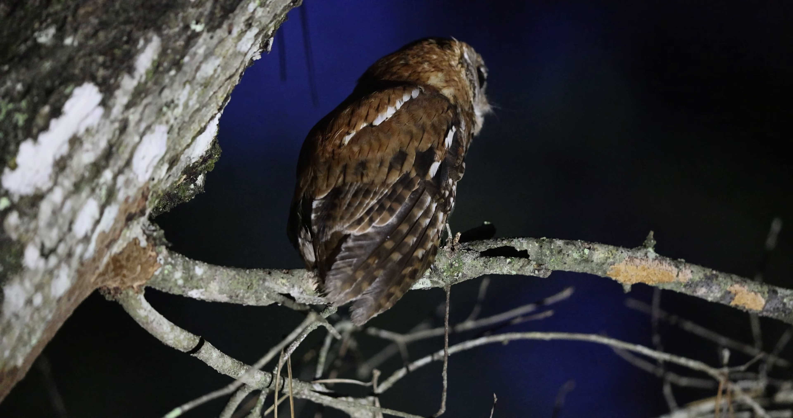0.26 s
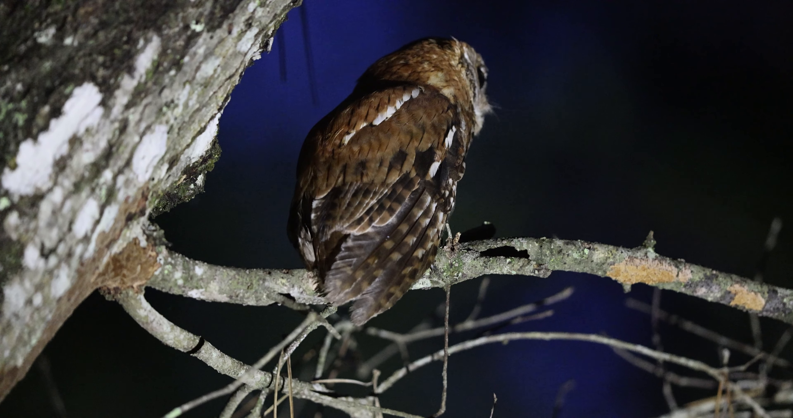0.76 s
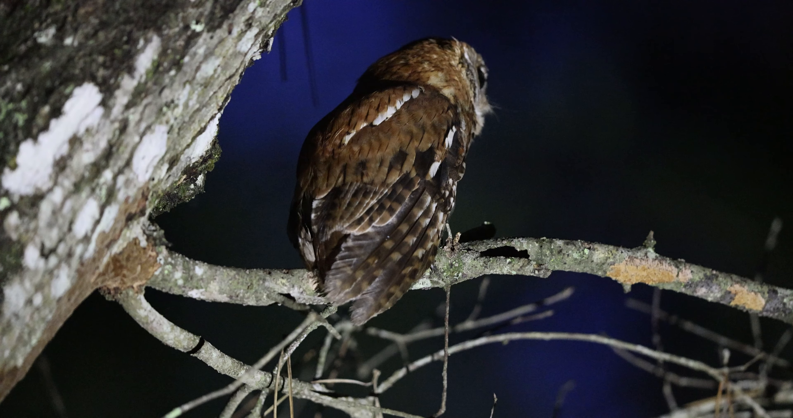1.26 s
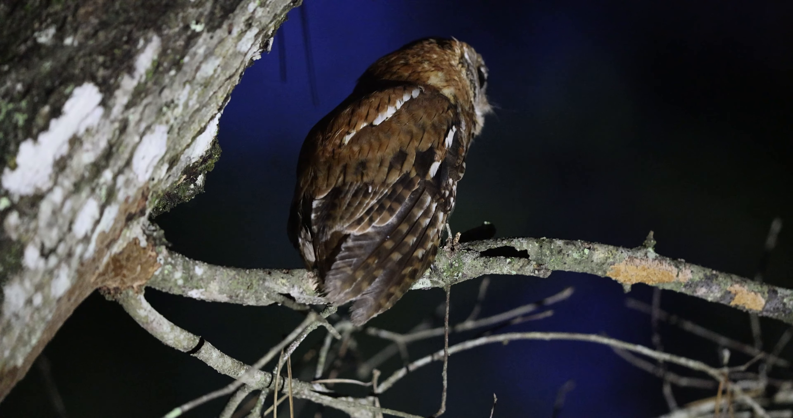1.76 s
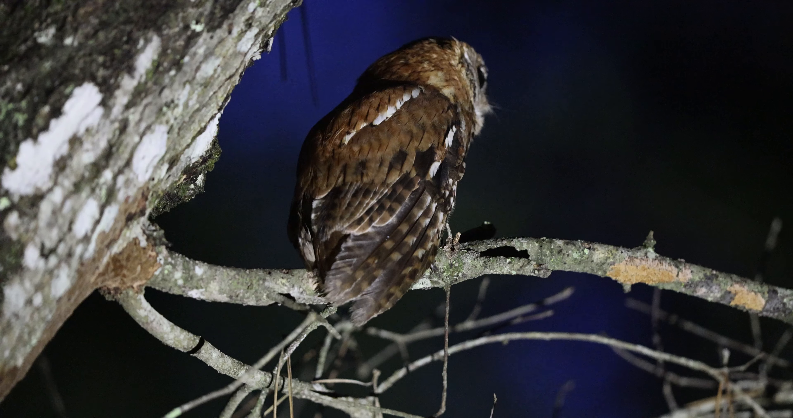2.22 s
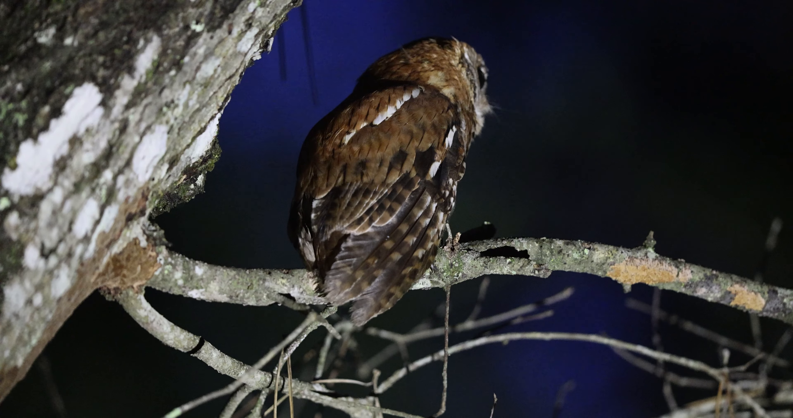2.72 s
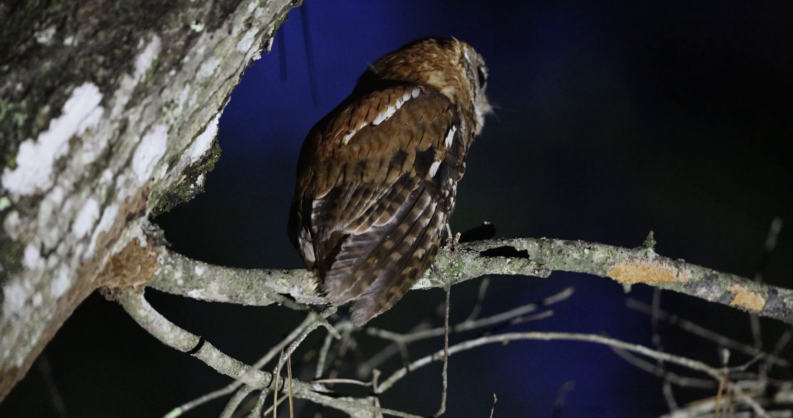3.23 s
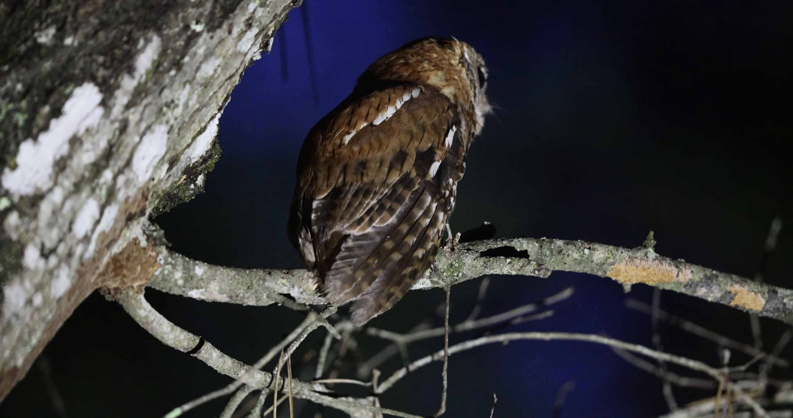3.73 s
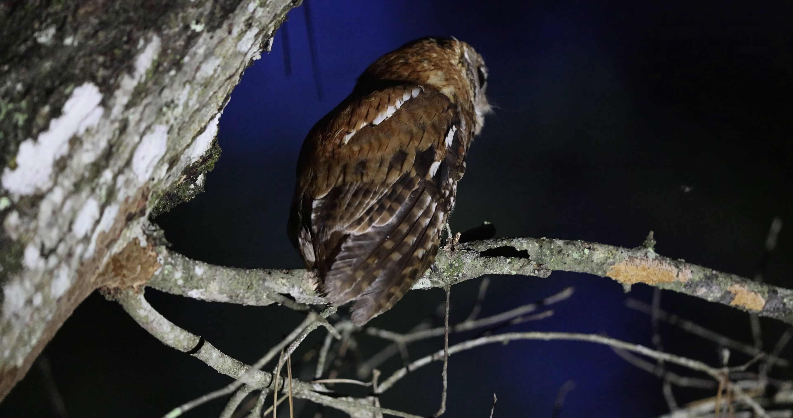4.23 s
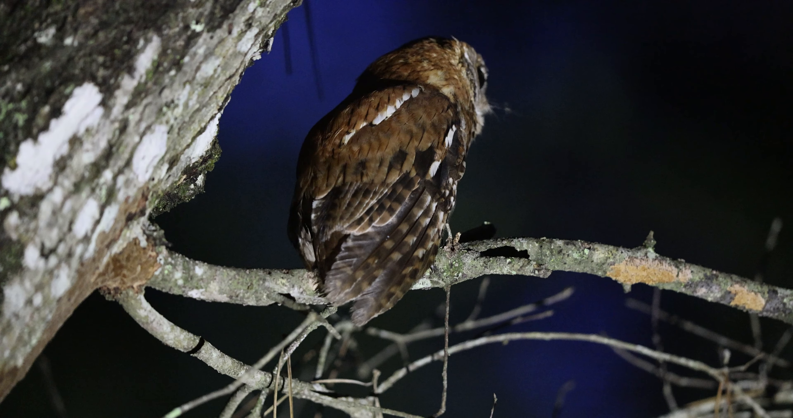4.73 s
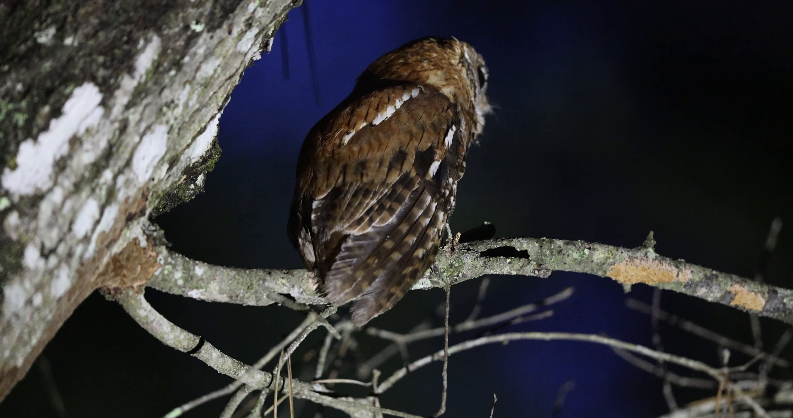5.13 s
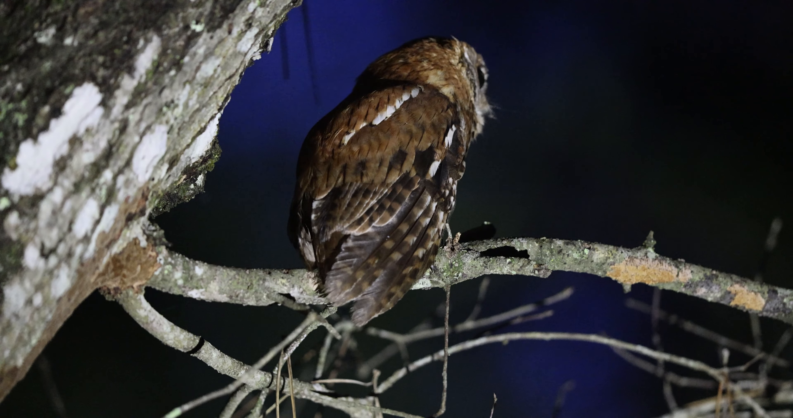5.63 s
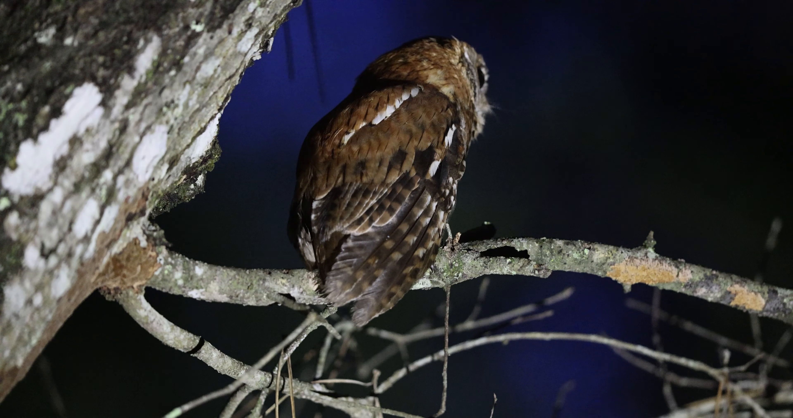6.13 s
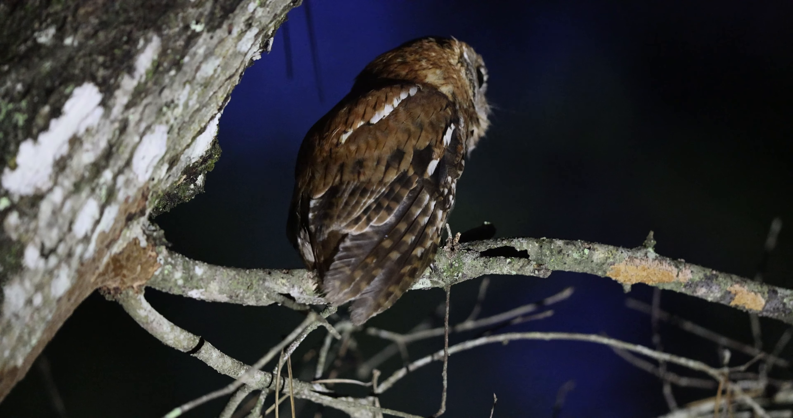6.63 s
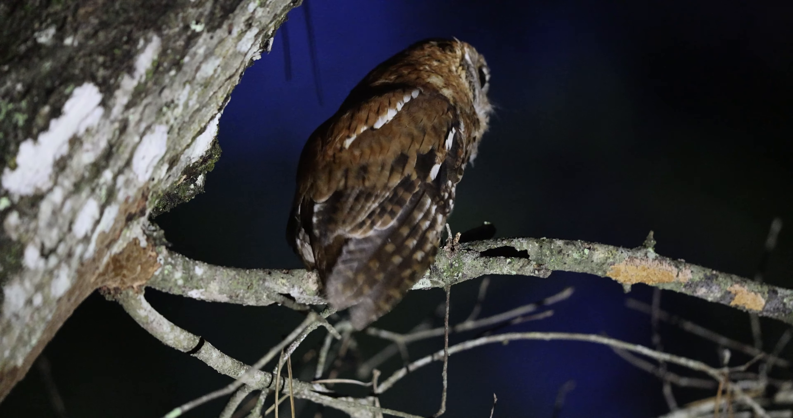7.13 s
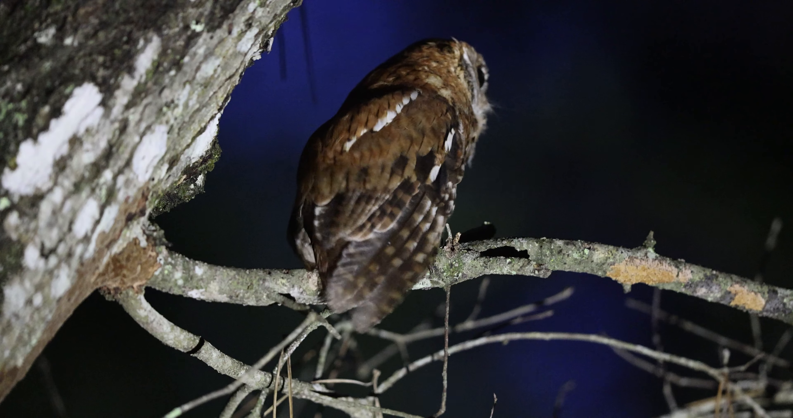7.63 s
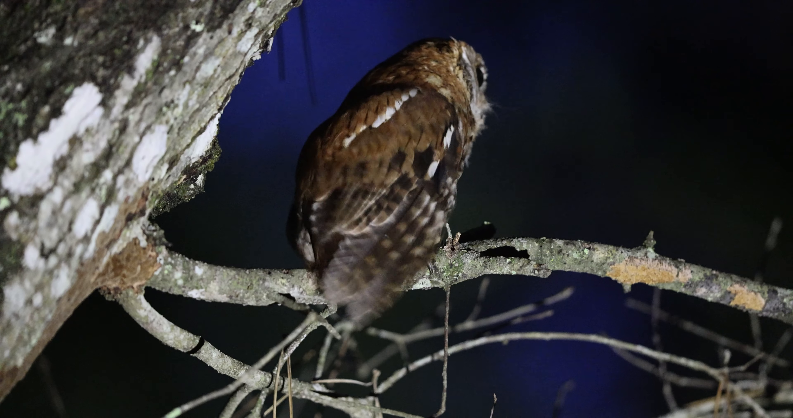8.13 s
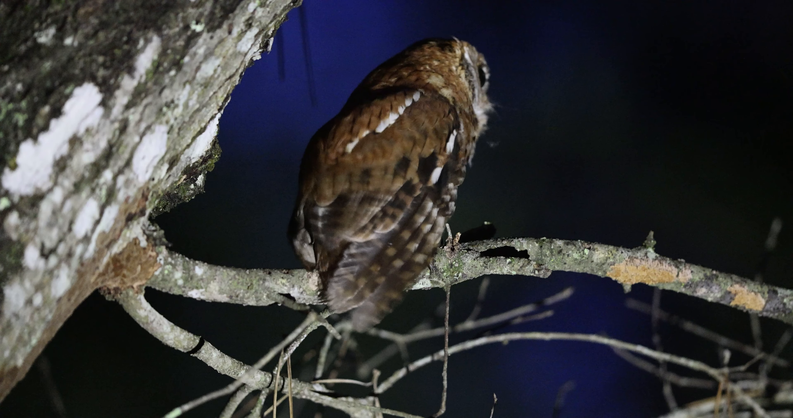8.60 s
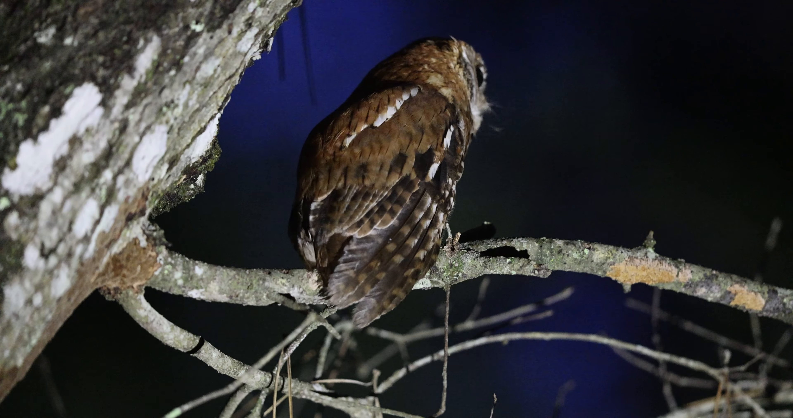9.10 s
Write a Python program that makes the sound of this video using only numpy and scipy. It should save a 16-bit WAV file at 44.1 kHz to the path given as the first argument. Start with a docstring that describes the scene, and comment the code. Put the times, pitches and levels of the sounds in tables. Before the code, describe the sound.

A high, throbbing cricket chorus and a buzzing katydid fill the woods at night. Lower insect trills and dry rasps come and go. Far off, a night bird repeats a short whistled song, and thin high chirps echo through the first half. Twigs tick faintly over a low wash of air, with one dull knock. Near the end, an owl close to the microphone gives one soft trill lasting about two seconds.

```python
"""A throbbing cricket chorus and a buzzing katydid fill the woods at night; lower trills and dry rasps
come and go. These insects stridulate: each wing stroke gives a brief tone or a run of tooth clicks.
Far off a nightjar repeats its whistled song and something chirps high up, both echoing among the trees.
Twigs tick over a low wash of air, and there is one dull knock and one faint moan. Late on, a screech owl
close by gives one soft trill of nearly pure notes, each arching in pitch with the pressure of its puff."""
import sys
import numpy as np
from scipy import signal
from scipy.fft import rfft, irfft
from scipy.io import wavfile
from scipy.ndimage import uniform_filter1d

SR = 44100
rng = np.random.default_rng(int(sys.argv[2]) if len(sys.argv) > 2 else 0)


def transcribe(u):
    """Save the signal u as a 16-bit wav file named by the first command-line argument.

    u: samples, shape (n,) or (channels, n), limited to [-1, 1]; the rate is SR.
    q: integer samples, one column per channel.
    """
    v = np.clip(np.atleast_2d(u).T, -1, 1)
    q = np.round(v * 32767).astype(np.int16)
    wavfile.write(sys.argv[1], SR, q)


N = 412776
TIME = np.arange(N) / SR

# Near crickets of the chorus. Each row: pitch in Hz, pulses per second, relative level in dB.
CHORUS_VOICES = [(6370, 47, -18.5), (6556, 57, -4), (6680, 67, 1), (6874, 75, -2.5), (6820, 56.7, 3),
                 (6800, 50, -4), (7150, 43, -25), (7030, 71, -5)]
# Spectrum of the far crickets. Each row: frequency in Hz, relative level in dB.
FAR_CRICKET_SPECTRUM = [(5700, -30), (6100, -25), (6400, -8.5), (6650, 0), (6820, -0.5), (7100, -12),
                        (7350, -34), (7600, -34)]
# Throbbing of the chorus. Each row: throbs per second, time of one crest in seconds, depth in dB.
CHORUS_THROBS = [(3.553, .151, 1.3), (3.389, .287, .75), (3.212, .027, .6)]
# Loudness of the near katydid. Each row: time in seconds, level in dB before the trim.
KATYDID_LEVELS = [(0.0, -55), (3.8, -56), (4.8, -54.5), (8.26, -58), (9.36, -56)]
# Tooth strikes in one wing stroke. Each row: position as a share of the stroke, relative level in dB.
TOOTH_STRIKES = [(.08, 0), (.19, -1), (.28, 0), (.36, 0), (.43, -3), (.55, -5)]
# Spectrum of the near katydid's buzz as picked up; the microphone or audio coder adds the narrow
# notch at 13.9 kHz. Each row: frequency in Hz, relative level in dB.
PICKED_UP_BUZZ_SPECTRUM = [(6500, -30), (7700, -3), (9500, 3), (10800, -1), (12300, -1), (12700, -6),
                           (13500, -4), (13900, -10), (14250, -2), (14700, 1), (15200, -6), (15700, -7)]
# Spectrum of the far katydids. Each row: frequency in Hz, relative level in dB.
FAR_KATYDID_SPECTRUM = [(6800, -35), (7350, 1.5), (7500, -1), (8700, 1.5), (9800, 0.5), (11000, -9.5),
                        (12300, -18), (12800, -39), (15700, -35)]
# Pulsed trills, likely tree crickets. Each row: start, end and swell time in seconds, pitch in Hz,
# pulses per second, share of each stroke that sounds, level in dB before the trim.
TRILL_BOUTS = [(-.2, .92, .1, 3060, 66.5, .8, -55), (.94, 1.618, .2, 3150, 66.2, .68, -41),
               (1.5, 4.7, .1, 3020, 66, .9, -64.5), (1.8, 3.3, .2, 3055, 66, .8, -55.7),
               (1.88, 2.47, .3, 3025, 68, .85, -52.7), (3.22, 4.03, .26, 2985, 68, 1, -50.5),
               (5.08, 6.96, .15, 3060, 66.7, .8, -55), (6.08, 6.72, .15, 3020, 68.5, .68, -53.5),
               (6.94, 9.5, .12, 3140, 66.5, .66, -53.5), (7.38, 8.42, .25, 2985, 68, 1, -50.3)]
# Distant insect rasping. Each row: start and end in seconds, full level in dB before the trim.
RASP_BOUTS = [(-.8, .22, -63), (.2, .93, -63), (1.4, 2.65, -62), (3.5, 4.5, -63), (5.55, 6.38, -61),
              (7.0, 8.48, -63)]
# Spectra of the rasp and of the night air. Each row: frequency in Hz, relative level in dB.
RASP_SPECTRUM = [(3200, -33), (3550, 5), (4000, 2), (4400, 1), (4650, -9.5)]
AIR_SPECTRUM = [(15, -67), (25, -29), (48, -17), (64, -14.5), (85, -6), (152, -5.5), (216, -5), (295, -5.5),
                (331, -2), (470, -3), (560, 1), (842, -7.5), (1480, -3), (1910, -6), (2600, -9.5),
                (3380, -11), (5720, -120)]
# A far low drone, perhaps traffic. Each row: time in seconds, pitch in Hz, level in dB.
DRONE_CONTOUR = [(0, 125, -81), (2.3, 120, -88), (2.8, 108, -73.5), (3.5, 104, -75), (4.0, 88, -74.5),
                 (5.0, 84, -81), (6.2, 120, -92)]
# Songs of the nightjar. Each row: time in seconds, level in dB before the trim.
NIGHTJAR_SONGS = [(.365, -45), (2.621, -43.5), (5.105, -44.5), (7.119, -44), (9.232, -43)]
# One contour per syllable: a faint cluck, then two whistles.
# Each row: offset from the song's time in seconds, pitch in Hz, relative level in dB.
NIGHTJAR_SYLLABLES = [
    [(-.32, 2400, -26), (-.305, 2050, -10), (-.29, 1700, -11), (-.275, 1400, -30)],
    [(-.03, 1250, -17), (-.002, 1650, -5), (.011, 2100, -7), (.022, 2480, -9), (.037, 1900, -9),
     (.057, 1350, -11), (.072, 1650, -7), (.092, 1940, -3), (.118, 1700, 1), (.148, 1630, 0),
     (.172, 1480, -16)],
    [(.358, 1400, -16), (.376, 1620, 2), (.39, 1720, 0), (.4, 2150, -6), (.411, 2540, -7), (.424, 2000, -7),
     (.445, 1650, -6), (.465, 2100, -8), (.51, 1400, -9), (.55, 1200, -18)],
]
# Clear snaps in the foliage. Each row: time in seconds, level in dB before the trim.
CLEAR_TICKS = [(0.189, -46), (1.028, -42), (2.165, -46), (2.514, -49), (4.47, -50), (4.9986, -54),
               (6.621, -45), (8.7894, -47), (8.8478, -51)]
# Spectrum of a snap. Each row: frequency in Hz, relative level in dB.
TICK_SPECTRUM = [(400, -8), (900, -0.5), (1400, 4), (2400, 0), (4000, -7), (7000, -32)]
# High falling chirps. Each entry: time in seconds.
CHIRP_TIMES = [.27, .685, 1.04, 1.468, 1.91, 2.278, 2.615, 2.985, 3.42, 3.825, 4.228, 4.688]
# One chirp. Each row: offset from its time in seconds, pitch as a ratio, relative level in dB.
CHIRP_CONTOUR = [(-.025, .955, -16), (-.008, .995, -3), (.005, 1.012, 0), (.03, .985, 0), (.06, .952, -2),
                 (.1, .91, -13)]
# Spectra of the knock and of the moan. Each row: frequency in Hz, relative level in dB.
KNOCK_SPECTRUM = [(500, -4), (800, -2), (1150, 1), (1600, -7), (2500, -20)]
MOAN_SPECTRUM = [(280, -18), (335, -2), (385, -4), (450, -14)]
# The owl quickens, eases off, then hurries to the end. Each row: time in seconds, notes per second.
OWL_NOTE_RATES = [(6.78, 13.61), (6.835, 12.45), (7.713, 15.15), (8.046, 11.22), (8.357, 12.5),
                  (8.636, 17.06), (8.94, 16.31)]
# How hard the owl sings. Each row: time in seconds, peak level of the fundamental in dB.
OWL_LEVELS = [(6.78, -48.5), (6.85, -41.5), (6.96, -38), (7.25, -36.5), (7.6, -38), (8.03, -37),
              (8.63, -38), (8.77, -40), (8.94, -41.5), (9.0, -47.5)]


def from_db(db):
    """Amplitude grows tenfold for every 20 dB."""
    return 10 ** (np.asarray(db) / 20)


def unit_power(x):
    """Dividing a signal by its RMS value gives it unit power."""
    return x / np.sqrt(np.mean(x ** 2) + 1e-20)


def along(rows, at=TIME):
    """Linear interpolation reads each later column of a table against the first."""
    first, *columns = np.transpose(rows)
    return [np.interp(at, first, column) for column in columns]


def drift(cutoff_hz):
    """Low-pass filtering turns white noise into a smooth fluctuation of unit power."""
    hz = np.fft.rfftfreq(N, 1 / SR)
    return unit_power(irfft(rfft(rng.standard_normal(N)) / (1 + (hz / cutoff_hz) ** 4), N))


def coloured(x, spectrum):
    """A filter imposes a spectrum that falls 40 dB per octave beyond its ends; output has unit power."""
    hz = np.maximum(np.fft.rfftfreq(N, 1 / SR), 1)
    points_hz, db = np.transpose(spectrum)
    octaves_outside = np.abs(np.log2(hz / np.clip(hz, points_hz[0], points_hz[-1])))
    gain = from_db(np.interp(np.log(hz), np.log(points_hz), db) - 40 * octaves_outside)
    return unit_power(irfft(rfft(x) * gain, N))


def hiss(spectrum):
    """Filtered white noise takes on the spectrum of the filter."""
    return coloured(rng.standard_normal(N), spectrum)


def phase_of(hz):
    """Phase is the time integral of frequency."""
    return 2 * np.pi * np.cumsum(hz) / SR


def woods(x, wet_db, t60):
    """Scattering from trunks and leaves adds to the direct sound a tail that falls 60 dB in t60 seconds."""
    t = TIME[:SR]
    build_up = np.clip((t - .004) / .015, 0, 1)
    scatter = rng.standard_normal(SR) * from_db(-60 * t / t60) * build_up
    return x + from_db(wet_db) * signal.fftconvolve(x, scatter / np.linalg.norm(scatter))[:N]


def stridulation(per_s, hz, duty, sag, jitter, slip_rad):
    """Each wing stroke excites a short, sagging tone; timing, pitch, strength and phase vary by chance."""
    strokes = np.cumsum(per_s * (1 + jitter * drift(30))) / SR
    position, index = strokes % 1, strokes.astype(int)
    detune, strength, start_phase = rng.standard_normal((3, index[-1] + 1))[:, index]
    pulse = np.sin(np.pi * np.minimum(position / duty, 1)) * from_db(.5 * strength)
    pitch = hz * (1 + .1 * jitter * detune - sag * (position - duty / 2))
    return unit_power(pulse * np.sin(phase_of(pitch) + slip_rad * start_phase))


def cricket_chorus(level_db=-45, waver_db=.78):
    """Near and far crickets superpose and throb together at three close rates, which beat."""
    near = sum(from_db(db) * stridulation(per_s, hz, duty=.85, sag=.012, jitter=.04, slip_rad=.82)
               for hz, per_s, db in CHORUS_VOICES)
    voices = unit_power(woods(near, wet_db=-6, t60=.18)) + from_db(-1) * hiss(FAR_CRICKET_SPECTRUM)
    throb_db = sum(depth * np.cos(2 * np.pi * per_s * (TIME - crest))
                   for per_s, crest, depth in CHORUS_THROBS)
    return unit_power(voices) * from_db(level_db + throb_db + waver_db * drift(9))


def close_echoes(x, decay_s, ring_db):
    """Short echoes from nearby surfaces follow every click briefly, rippling its spectrum."""
    ring = rng.standard_normal(SR // 20) * np.exp(-TIME[:SR // 20] / decay_s)
    return x + from_db(ring_db) * signal.fftconvolve(x, ring / np.linalg.norm(ring))[:N]


def katydids(strokes_per_s=63.8, count=620, tooth_s=.00026, trim_db=-.5, far_db=-53):
    """Tooth impacts excite the wing in a short run each stroke; far katydids merge into hiss."""
    strokes = np.arange(count) + np.cumsum(rng.normal(0, .0068, count))
    clicks = np.zeros(N)
    for share, db in TOOTH_STRIKES:
        strike_s = (strokes + share + rng.normal(0, .014, count)) / strokes_per_s
        at = (strike_s * SR).astype(int)
        clicks[at[at < N]] += from_db(db + rng.normal(0, 1, count))[at < N]
    decays = signal.lfilter([1], [1, -np.exp(-1 / (tooth_s * SR))], clicks + 1e-18)
    bursts = decays * rng.choice([-1, 1], N)
    echoed = close_echoes(bursts, decay_s=.004, ring_db=-3)
    buzz = coloured(woods(echoed, wet_db=-6, t60=.25), PICKED_UP_BUZZ_SPECTRUM)
    far = coloured(close_echoes(rng.standard_normal(N), decay_s=.0056, ring_db=-10), FAR_KATYDID_SPECTRUM)
    return buzz * from_db(along(KATYDID_LEVELS)[0] + trim_db) + from_db(far_db) * far


def trills(swell_db=16, trim_db=-.15, run_up=.055, near_db=-38, far_db=-73.5):
    """Stridulation swells up to pitch, holds and stops dead; the fainter it is, the more is scattered."""
    direct, to_scatter = np.zeros(N), np.zeros(N)
    for start, end, swell_s, hz, per_s, duty, db in TRILL_BOUTS:
        gate = np.clip(np.minimum(TIME - start, end - TIME) / .006, 0, 1)
        slack = np.clip(1 - (TIME - start) / swell_s, 0, 1)
        level = gate * from_db(db + trim_db - swell_db * slack)
        pitch = hz * (1 - run_up * slack)
        song = level * stridulation(per_s, pitch, duty, sag=.08, jitter=.016, slip_rad=.83)
        echo_share = np.clip((near_db - db) / (near_db - far_db), 0, 1)
        direct += np.sqrt(1 - echo_share) * song
        to_scatter += np.sqrt(echo_share) * song
    echo = woods(to_scatter, wet_db=0, t60=.24) - to_scatter
    return direct + echo


def rasps(swell_db=8, trim_db=-3.5, low_hz=3500.0, high_hz=4480.0, edge_db=-3.5, per_s=99):
    """Amplitude-modulated noise makes a dry rasp; a narrow band climbs in pitch as each bout grows."""
    level, edge_hz = np.zeros(N), np.full(N, low_hz)
    for start, end, db in RASP_BOUTS:
        on = (TIME > start) & (TIME < end)
        effort = np.minimum(1.5 * (TIME[on] - start) / (end - start), 1)
        level[on] = from_db(db + trim_db - swell_db * (1 - effort) ** 1.5)
        edge_hz[on] = low_hz + (high_hz - low_hz) * effort
    edge = from_db(edge_db) * drift(130) * np.sin(phase_of(edge_hz))
    pulses = 1 + .55 * np.sin(phase_of(per_s * (1 + .06 * drift(17))))
    return uniform_filter1d(level, size=1500) * pulses * (hiss(RASP_SPECTRUM) + edge)


def night_air(air_db=-60.5, leaf_db=-63.5, hum_db=-76, hum_hz=227.0):
    """Broadband noise gives a low wash and leaf hiss; narrowband noise gives a far drone and a hum."""
    drone_hz, drone_db = along(DRONE_CONTOUR)
    phase = phase_of(drone_hz)
    drone = from_db(drone_db) * (drift(17) * np.sin(phase) + drift(9.1) * np.cos(phase))
    hum = from_db(hum_db) * drift(3.9) * np.sin(phase_of(np.full(N, hum_hz)))
    leaves = hiss([(1800, -4), (2600, -4), (3100, 4), (4200, 1.5), (5300, -5), (6200, 0), (15000, -18)])
    return from_db(air_db) * hiss(AIR_SPECTRUM) + from_db(leaf_db) * leaves + drone + hum


def whistle(time_s, contour, waver):
    """A pure tone follows a contour of pitch and level, made unsteady by random frequency modulation."""
    on = (TIME > time_s + contour[0][0]) & (TIME < time_s + contour[-1][0])
    offset_s = TIME[on] - time_s
    hz, db = along(contour, offset_s)
    tremor = np.interp(offset_s, np.linspace(-1, 1, 300), rng.standard_normal(300))
    tone = np.zeros(N)
    tone[on] = from_db(db) * np.sin(phase_of(hz * (1 + waver * tremor)))
    return tone


def nightjar(trim_db=-5.5, waver=.025):
    """A repeated whistled song is half masked by its own reverberation among the trees."""
    songs = sum(from_db(db + trim_db) * whistle(time_s, syllable, waver)
                for time_s, db in NIGHTJAR_SONGS for syllable in NIGHTJAR_SYLLABLES)
    thicket = woods(songs, wet_db=0, t60=.08)
    return woods(thicket, wet_db=-2, t60=1.0)


def twig_ticks(t60=.047, trim_db=-4.5, faint_per_s=7.5):
    """Twigs and leaves snap in exponentially decaying noise bursts, a few clear among many faint."""
    snaps = (rng.random(N) < faint_per_s / SR) * from_db(-60.5 + 6.8 * rng.uniform(-.58, 1, N))
    for time_s, db in CLEAR_TICKS:
        snaps[int(time_s * SR)] += from_db(db + trim_db)
    decays = signal.lfilter([1], [1, -from_db(-60 / (t60 * SR))], snaps + 1e-18)
    return woods(decays * hiss(TICK_SPECTRUM), wet_db=-3, t60=.22)


def high_chirps(pitch_hz=4983, pitch_spread=.00516, level_db=-55.5, waver=.0035):
    """Scattering from near leaves breaks up thin, arched chirps, and long reverberation follows."""
    pitches = pitch_hz * (1 + pitch_spread * rng.standard_normal(len(CHIRP_TIMES)))
    chirps = sum(whistle(time_s, np.array(CHIRP_CONTOUR) * [1, hz, 1], waver)
                 for time_s, hz in zip(CHIRP_TIMES, pitches))
    thicket = woods(from_db(level_db) * chirps, wet_db=-3, t60=.08)
    return woods(thicket, wet_db=0, t60=1.84)


def knock(start_s=2.05, level_db=-51.5, attack_s=.0049, t60=.15):
    """A quickly damped burst of noise makes a dull knock, blurred by scattering from the trees."""
    age = np.maximum(TIME - start_s, 0)
    envelope = np.minimum(age / attack_s, 1) * from_db(level_db - 60 * np.minimum(age / t60, 2))
    return woods(envelope * hiss(KNOCK_SPECTRUM), wet_db=-1, t60=.3)


def moan(centre_s=3.66, length_s=.22, level_db=-63.5):
    """A low, narrow band of noise under a Gaussian envelope is heard as a faint, hollow moan."""
    envelope = np.exp(-(2 * (TIME - centre_s) / length_s) ** 2)
    return from_db(level_db) * envelope * hiss(MOAN_SPECTRUM)


def owl_beats(centre_s, end_s):
    """Period is the reciprocal of rate: each note's centre lies one period after the last."""
    while centre_s < end_s:
        period_s = 1 / along(OWL_NOTE_RATES, centre_s)[0]
        yield centre_s, period_s
        centre_s += period_s


def screech_owl(start_s=6.778, end_s=9.03, pitch_hz=701, hz_per_db=3.4, sink_hz_per_s=7, echo_s=.016):
    """The pitch of each nearly pure note rises and sinks with the pressure of the puff that drives it."""
    voice = np.zeros(N)
    wobble = 1 + .0036 * drift(89)
    attack, release, arch_top = .39, .33, .462   # shares of a note's length
    for centre_s, period_s in owl_beats(start_s, end_s):
        db, = along(OWL_LEVELS, centre_s)
        effort_db = db + 37   # zero at full effort
        top_hz = pitch_hz + hz_per_db * effort_db - sink_hz_per_s * (centre_s - start_s)
        length_s = .745 * period_s * np.exp(.035 * effort_db)   # weak notes are shorter
        span = slice(int((centre_s - length_s / 2) * SR), int((centre_s + length_s / 2) * SR))
        position = (TIME[span] - centre_s) / length_s + .5
        ramp = np.clip(np.minimum(position / attack, (1 - position) / release), 0, 1)
        swell = np.sin(np.pi / 2 * ramp) ** 2
        arch = 1 - .11 * (2 * (position - arch_top)) ** 2
        phase = phase_of(top_hz * arch * wobble[span])
        overtones = from_db(-16) * np.sin(2 * phase) + from_db(-33) * np.sin(3 * phase)
        voice[span] += from_db(db) * (swell * np.sin(phase) + swell ** .75 * overtones)
    limb_echo = from_db(-20.5) * np.interp(TIME - echo_s, TIME, voice)
    return woods(voice + limb_echo, wet_db=-23, t60=.66)   # close by, so direct sound dominates


def scene():
    """By superposition, the pressures of all the sources add at one microphone."""
    insects = cricket_chorus() + katydids() + trills() + rasps()
    surroundings = night_air() + nightjar() + twig_ticks() + high_chirps() + knock() + moan()
    return (insects + surroundings + screech_owl())[None]


def record(dry, cutoff_hz=15720):
    """A steep linear-phase low-pass filter removes the highest treble."""
    low_pass = signal.firwin(801, cutoff_hz, fs=SR)
    return signal.fftconvolve(dry, low_pass[None], mode="same")


dry = scene()
out = record(dry)
transcribe(out)
```